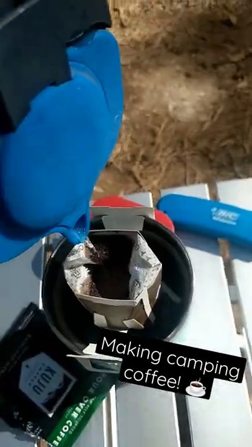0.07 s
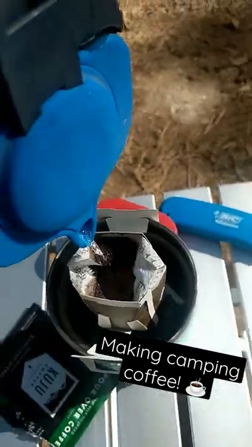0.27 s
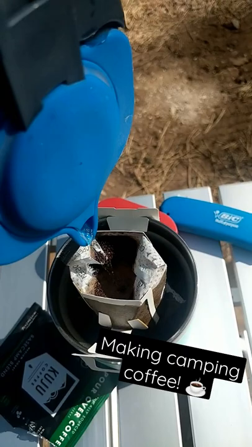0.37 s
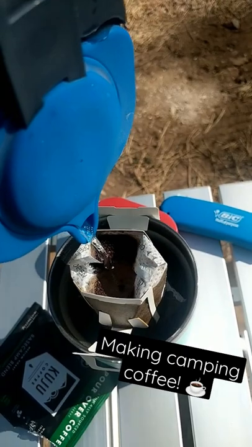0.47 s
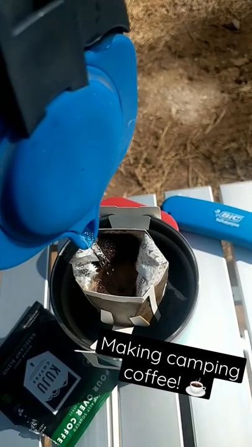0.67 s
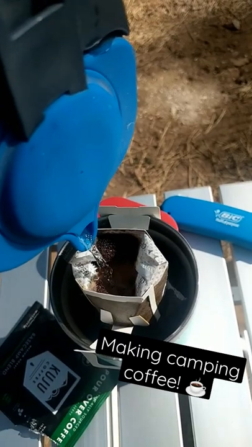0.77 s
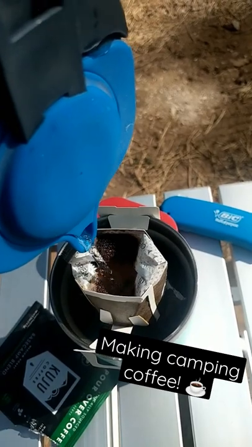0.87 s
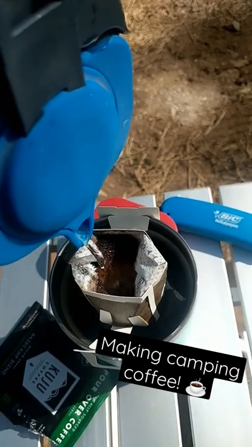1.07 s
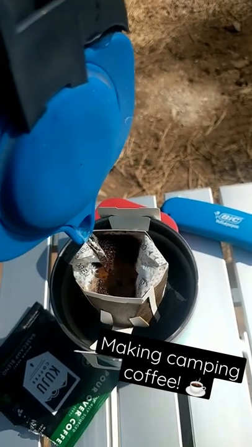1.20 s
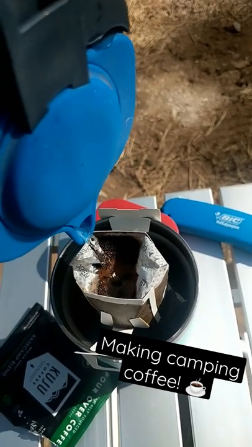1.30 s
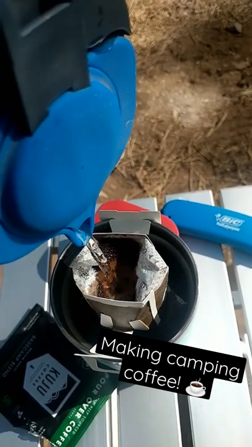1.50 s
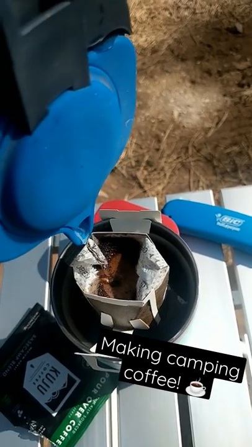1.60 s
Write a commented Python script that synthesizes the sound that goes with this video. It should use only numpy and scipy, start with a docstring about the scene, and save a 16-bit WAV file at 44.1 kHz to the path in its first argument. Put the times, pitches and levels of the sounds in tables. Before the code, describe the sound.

Water pours faintly from a kettle into a coffee filter, fizzing and gurgling softly under a steady outdoor hush. The metal kettle clinks at 0.2 seconds, with small bubbles. Low wind thumps the microphone, strongest around 0.6 seconds, as a distant bird whistles. Drops tick on the paper from about 1 second. Near 1.4 seconds the kettle tings and bubbles again, and the bird sings a louder phrase.

```python
"""Over a steady outdoor hush, light wind thumps on the microphone while a thin stream of water runs
from a kettle into a coffee filter, fizzing faintly. The metal kettle tings, then clinks once, with
soft gurgles and bubbles. A far bird whistles, echoed by trees, and a few drops tick on the paper.
Near the end the kettle tings and bubbles again, and the bird sings a louder phrase."""
import sys
import numpy as np
from scipy import signal
from scipy.fft import rfft, irfft, next_fast_len
from scipy.io import wavfile
from scipy.ndimage import uniform_filter1d, map_coordinates

SR = 44100
rng = np.random.default_rng(int(sys.argv[2]) if len(sys.argv) > 2 else 0)


def dump(signal):
    """Clip the signal to [-1, 1] and save it as 16-bit WAV at the path in sys.argv[1]."""
    limited = np.clip(np.atleast_2d(signal).T, -1, 1)
    pcm = np.round(limited * 32767).astype(np.int16)
    wavfile.write(sys.argv[1], SR, pcm)


N = 72765


def amp(db):
    """Decibels to gain."""
    return 10 ** (np.asarray(db) / 20)


def unit(x):
    """Scaled to rms 1."""
    return x / np.sqrt(np.mean(x ** 2) + 1e-20)


def clock():
    """The time of every sample."""
    return np.arange(N) / SR


def gaussian(x, width):
    """A bell curve of height 1; width is its standard deviation."""
    return np.exp(-.5 * (x / width) ** 2)


def curves(rows):
    """One value per sample for each column after the time."""
    times, *columns = np.transpose(rows)
    return [np.interp(clock(), times, column) for column in columns]


def wobble(rate):
    """A smooth random curve, rate knots a second."""
    return map_coordinates(rng.standard_normal(2048), [clock() * rate], mode="wrap")


def filtered(x, response):
    """The spectrum of x times a frequency response."""
    size = next_fast_len(N + 8192)
    return irfft(rfft(x, size) * response(np.fft.rfftfreq(size, 1 / SR)), size)[:N]


def coloured(x, spectrum):
    """x shaped by (Hz, dB) points, at rms 1."""
    f, db = np.transpose(spectrum)
    return unit(filtered(x, lambda hz: amp(np.interp(np.log(hz + 1), np.log(f), db))))


def noise(spectrum):
    """Coloured noise of rms 1."""
    return coloured(rng.standard_normal(N), spectrum)


def add(track, s, sound):
    """Mixes a sound into the track at time s."""
    part = track[max(0, round(s * SR)):][:len(sound)]
    part += sound[:len(part)]


def hush(level_db=-62):
    """Stationary broadband noise: the steady outdoor air."""
    # Each row: frequency in Hz, relative level in dB.
    spectrum = [(25, -38), (50, 17), (90, 0), (150, 4.5), (230, 2.5), (320, -2), (700, -5.5), (1500, -9.5),
                (3000, -12), (6000, -16.5), (10000, -19.5), (16000, -19)]
    return amp(level_db) * noise(spectrum)


def wind(eddy_cycles=0.38):
    """Turbulence at the microphone: pressure flutters, and each eddy is one quick suck and push."""
    # Each row: time in seconds, level in dB.
    gusts = [(0, -67), (.04, -56), (.085, -64.5), (.13, -56.5), (.175, -73), (.3, -58), (.36, -71),
             (.42, -49), (.445, -62), (.49, -50.5), (.6, -49.5), (.68, -41.5), (.72, -61), (.8, -53.5),
             (.88, -51.5), (.99, -62), (1.025, -74), (1.09, -64), (1.15, -73), (1.21, -54), (1.39, -63.5),
             (1.45, -71), (1.54, -78), (1.6, -79)]
    # Each row: frequency in Hz, relative level in dB.
    buffet = [(22, -52), (35, -26), (55, 2.5), (75, 4), (110, -1.5), (160, -18), (250, -29.5), (500, -52),
              (1500, -120)]
    # Each row: centre in seconds, envelope peak in dB, pitch in Hz.
    eddies = [(.046, -47.5, 60.3), (0.131, -46.5, 65.3), (0.234, -44.5, 94), (0.294, -44, 57.6),
              (.42, -46.5, 81.5), (0.482, -41, 58.5), (0.515, -38, 75.5), (.567, -37, 105),
              (0.6342, -28, 98), (0.665, -36, 113), (0.751, -33.5, 79), (0.818, -42, 94),
              (0.865, -46.5, 79.6), (.881, -42, 78), (1.213, -43, 58), (1.267, -41.5, 79),
              (1.339, -44.5, 61.4), (1.392, -48.5, 54)]
    level_db, = curves(gusts)
    flutter = noise(buffet)
    swell = np.sqrt(np.abs(uniform_filter1d(flutter ** 2, size=2200)) + .05)
    out = amp(level_db) * unit(flutter / swell)  # evened out so that the gusts set the level
    for s, db, hz in eddies:
        cycles = (clock() - s) * hz
        out += amp(db) * np.sin(2 * np.pi * cycles) * gaussian(cycles, eddy_cycles)
    return out


def pour(count=2400, size_db=3, life_cycles=3):
    """Tiny bubbles burst in the wet grounds; their damped oscillations superpose into a fizz."""
    # Each row: time in seconds, level in dB.
    levels = [(0, -76), (.27, -71.5), (.37, -75), (.43, -70), (.47, -74), (.52, -70.5), (.58, -72),
              (.68, -70), (.77, -71.5), (.94, -70), (.99, -79), (1.025, -110), (1.16, -79), (1.22, -69),
              (1.3, -81), (1.34, -70.5), (1.45, -76.5), (1.65, -79)]
    # Each row: frequency in Hz, relative gain in dB.
    fizz = [(300, -28), (1200, -12.5), (2500, -11), (4500, -8), (8000, -14), (15000, -41)]
    grains, t = np.zeros(N), np.arange(SR // 100) / SR
    for when, pitch, size in rng.random((count, 3)):
        cycles = 1500 * 6 ** pitch * t  # 1.5 to 9 kHz
        strength = amp(size_db * min(-np.log(1 - size), 4))
        add(grains, when * N / SR, strength * np.sin(2 * np.pi * cycles) * np.exp(-cycles / life_cycles))
    level_db, = curves(levels)
    return amp(level_db) * coloured(grains, fizz)


def kettle(crack_t60=.012):
    """Modal vibration: each contact rings the metal; where it lands decides which modes speak."""
    # Each row: start in seconds, gain in dB, favoured pitch in Hz, fall-off around it in dB per octave,
    # relative crack level in dB, rise time in seconds.
    contacts = [(0.054, -58, 9100, 24, -1, .0006), (.061, -64, 8600, 16, 3, .0006),
                (0.2062, -43, 1824, 7, -3, 0.00011), (0.229, -50.5, 5600, 50, -7, .001),
                (.684, -56, 8535, 30, -4, 0.0015), (1.443, -54, 6770, 15, -8, 0.002)]
    # Each row: frequency in Hz, relative level in dB, T60 in seconds. The pair near 6.8 kHz beats.
    modes = [(1090, -18, 0.12), (1600, -1.5, 0.013), (1828, 0.5, 0.07), (2040, -8, 0.016),
             (3000, -10, 0.015), (4300, -17, 0.042), (5600, -7.5, 0.035), (6797, -10, 0.23),
             (6830, -16.5, 0.33), (7030, 0, 0.024), (7400, -3, 0.025), (8560, -8.5, 0.068),
             (9710, -4, 0.041)]
    # Each row: frequency in Hz, relative level in dB.
    crack_spectrum = [(150, -1), (450, -16), (900, -7), (1500, 5), (8000, 3), (15000, -11)]
    out, t = np.zeros(N), np.arange(SR // 3) / SR
    for s, db, centre_hz, falloff_db, crack_db, rise_s in contacts:
        ring = np.zeros(len(t))
        for hz, mode_db, t60 in modes:
            excited_db = mode_db - falloff_db * abs(np.log2(hz / centre_hz))
            ring += amp(excited_db - 60 * t / t60) * np.sin(2 * np.pi * hz * t)
        crack = amp(crack_db - 60 * t / crack_t60) * noise(crack_spectrum)[:len(t)]
        add(out, s, amp(db) * (1 - np.exp(-t / rise_s)) * (ring + crack))
    return out


def gurgles(width_octaves=0.69):
    """Water shifts in the kettle, heard as soft swells of band-limited noise."""
    # Each row: centre in seconds, level in dB, half width in seconds, band centre in Hz.
    swells = [(.155, -78, .012, 480), (.355, -65.5, 0.022, 587), (.97, -73, 0.012, 596),
              (1.1, -70.5, 0.06, 533), (1.291, -69, 0.0095, 650), (1.443, -66.5, 0.02, 890)]
    out = np.zeros(N)
    for s, db, width, centre_hz in swells:
        white = rng.standard_normal(N)
        hollow = filtered(white, lambda hz: gaussian(np.log2((hz + 1) / centre_hz), width_octaves))
        out += amp(db) * gaussian(clock() - s, width) * unit(hollow)
    return out


def bubbles(rise_per_s=0.19):
    """Bubble resonance: each air pocket swells into a short, slightly rising tone and fades."""
    # Each row: centre in seconds, peak level in dB, pitch in Hz, half width in seconds.
    pockets = [(0.2272, -54.5, 1127, 0.006), (.2225, -58.5, 3600, 0.0031), (0.2486, -57, 1090, 0.0097),
               (1.434, -68, 950, 0.0022), (1.446, -58.5, 1020, 0.0026), (1.462, -63, 1130, 0.0044)]
    out = np.zeros(N)
    for s, db, hz, width in pockets:
        t = clock() - s
        cycles = hz * t * (1 + rise_per_s * t / 2)
        out += amp(db) * gaussian(t, width) * np.sin(2 * np.pi * cycles)
    return out


def bird(trill_hz=75.7, trill_swing=0.061, trill_db=5, waver=0.0069, trill_waver=.04, flutter_db=1.5):
    """Gliding whistles break into a trill: fast modulation of both frequency and amplitude."""
    # One table a note. Each row: time in seconds, pitch in Hz, level in dB, trill depth from 0 to 1.
    notes = [
        [(.555, 2440, -72, 0), (.568, 2654, -66, 0), (.583, 2474, -61.5, 0), (.6, 2210, -68, 0.5),
         (.618, 2020, -68, 0.7)],
        [(.625, 2150, -67, 0.58), (.641, 2473, -64, 0.43), (.655, 2786, -66.5, 0.6), (.672, 2896, -65, 0.9),
         (.684, 2827, -60.5, 0.5), (.697, 2380, -63, 0.3), (.712, 1820, -79, 0.3)],
        [(1.438, 2380, -67, 0.01), (1.455, 2333, -69.5, 0.1), (1.48, 2420, -63, 0.1), (1.505, 2513, -53, 0),
         (1.525, 2520, -49.5, 0.12), (1.532, 2530, -56.5, 0.2)],
        [(1.542, 2417, -55, 0.4), (1.556, 2203, -60.5, 0.4), (1.571, 2020, -63, .6)],
        [(1.576, 2496, -57, 0.38), (1.586, 2370, -66, 0.5), (1.593, 2180, -62, 0.7)],
        [(1.598, 2460, -64, 0.36), (1.606, 2490, -65, 0.17), (1.615, 2340, -68, 0.6), (1.63, 2245, -66, .5),
         (1.65, 2150, -69, 0.6)],
        [(1.611, 3060, -66, .2), (1.621, 2916, -70, .2), (1.625, 2700, -51, 0.16), (1.632, 2557, -50, 0.35),
         (1.636, 2480, -60, .3), (1.65, 2420, -66, 0.3)],
    ]
    t, song = clock(), np.zeros(N)
    for note in notes:
        start, end = note[0][0], note[-1][0]
        hz, db, depth = curves(note)
        trill = depth * np.exp(2j * np.pi * trill_hz * (t - start))
        gate = np.clip(np.minimum(t - start, end - t) / 0.0038 + 1, 0, 1)  # 3.8 ms fades
        jitter = (waver + trill_waver * depth) * wobble(400)
        cycles = np.cumsum(hz * (1 - trill_swing * trill.imag + jitter)) / SR
        level_db = db + trill_db * trill.real + flutter_db * wobble(150)
        song += gate * amp(level_db) * np.sin(2 * np.pi * cycles)
    return song


def among_trees(song, echo_db=-9.5, t60=.36, predelay_s=.006, count=60):
    """Scattering: tree trunks add delayed copies to the direct sound, the later the weaker."""
    echoes = np.zeros(SR // 2)
    for k, (place, polarity) in enumerate(rng.random((count, 2))):
        delay = t60 * (k + place) / count / 2
        reflection = np.sign(polarity - .5) * amp(-60 * delay / t60)
        add(echoes, predelay_s + delay, np.array([reflection]))
    return song + amp(echo_db) * signal.fftconvolve(song, echoes / np.linalg.norm(echoes))[:N]


def drops(t60=0.009, trim_db=-4):
    """Damped impacts: drops tick on the filter paper as fast-decaying bursts of noise."""
    # Each row: start in seconds, level in dB before the trim.
    ticks = [(.941, -54), (1.005, -51), (1.1049, -49.5), (1.113, -52), (1.393, -47), (1.613, -56),
             (1.6392, -53)]
    out, t = np.zeros(N), np.arange(SR // 30) / SR
    for s, db in ticks:
        paper = noise([(500, -1), (3500, -1.0), (9000, -10.5), (15000, -24)])[:len(t)]
        add(out, s, amp(db + trim_db - 60 * t / t60) * paper)
    return out


def scene():
    """Superposition: the pressures of all sources add at one microphone."""
    nearby = hush() + wind() + kettle() + bubbles() + drops() + pour() + gurgles()
    return (nearby + among_trees(bird()))[None]


def record(dry, low_cut_hz=34, top_hz=15800):
    """Band-pass filtering cuts the deepest rumble and keeps nothing above the band limit."""
    return np.array([filtered(channel, lambda hz: (hz < top_hz) / (1 + (low_cut_hz / (hz + 1)) ** 10))
                     for channel in dry])


dry = scene()
out = record(dry)
dump(out)
```